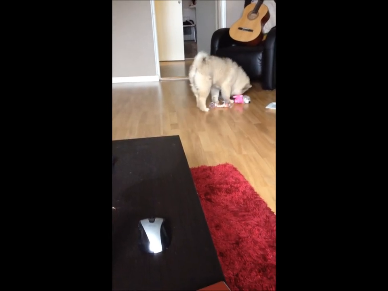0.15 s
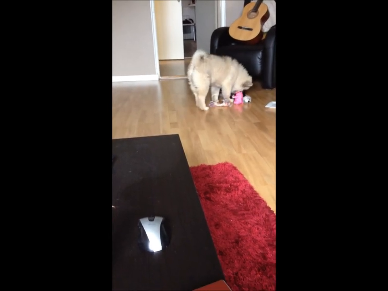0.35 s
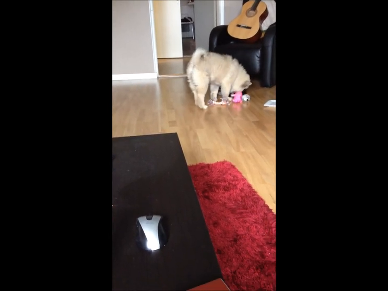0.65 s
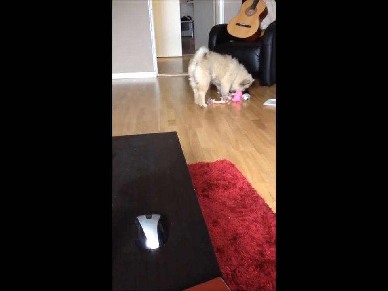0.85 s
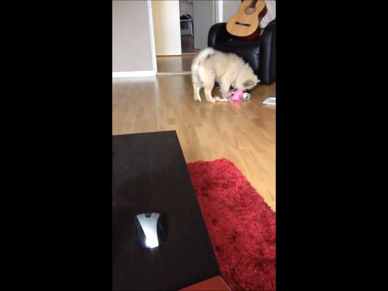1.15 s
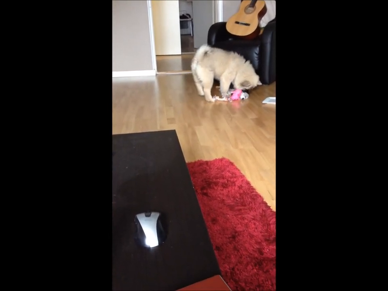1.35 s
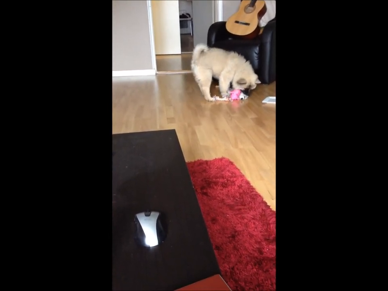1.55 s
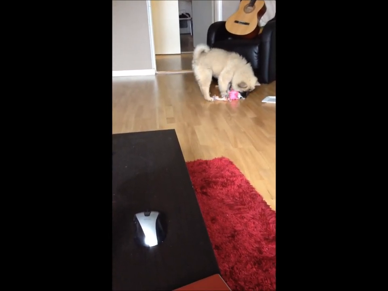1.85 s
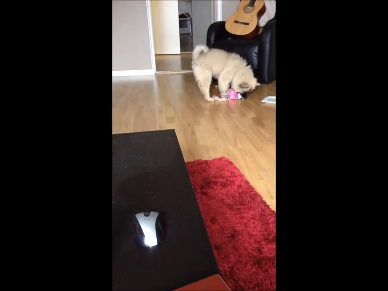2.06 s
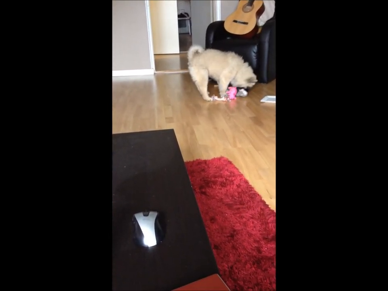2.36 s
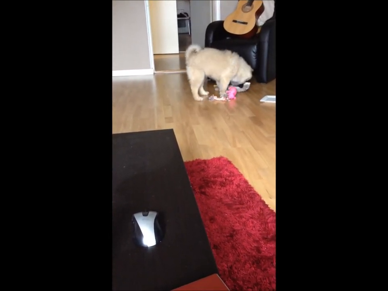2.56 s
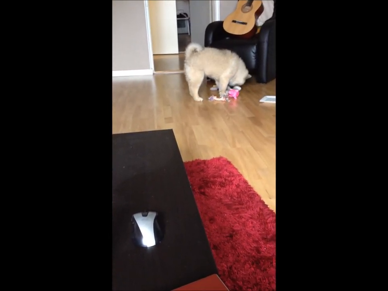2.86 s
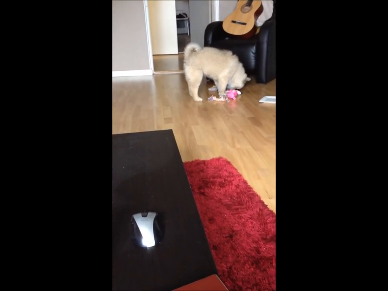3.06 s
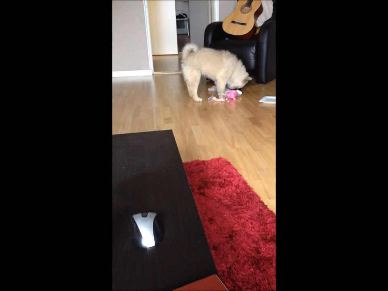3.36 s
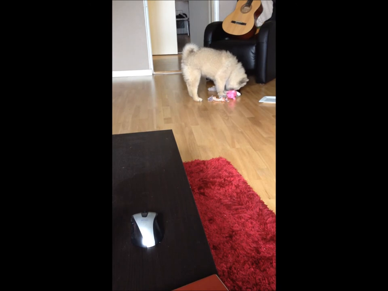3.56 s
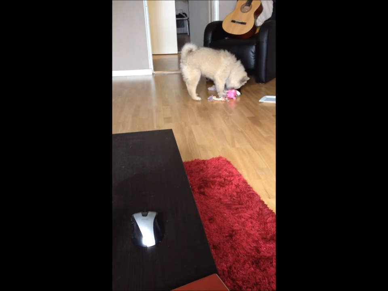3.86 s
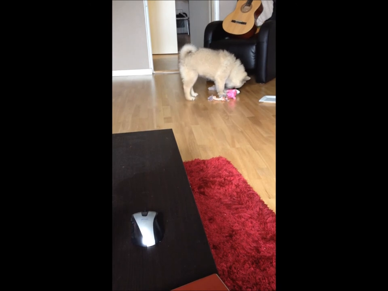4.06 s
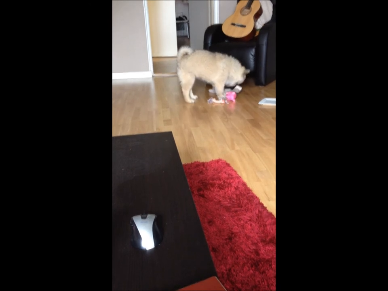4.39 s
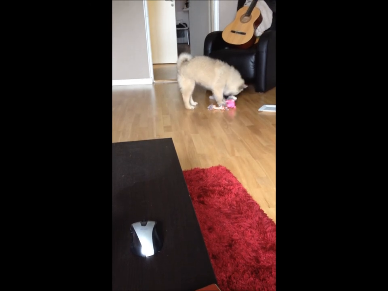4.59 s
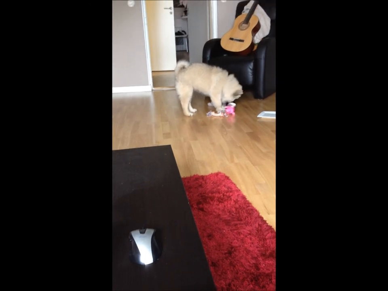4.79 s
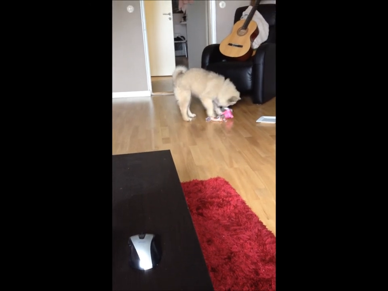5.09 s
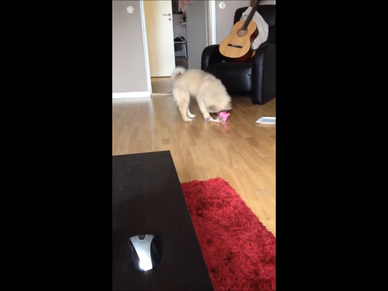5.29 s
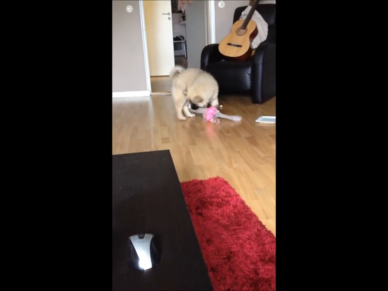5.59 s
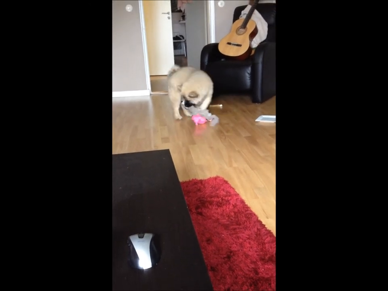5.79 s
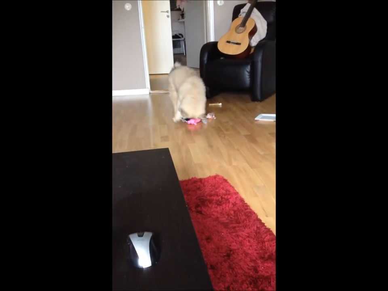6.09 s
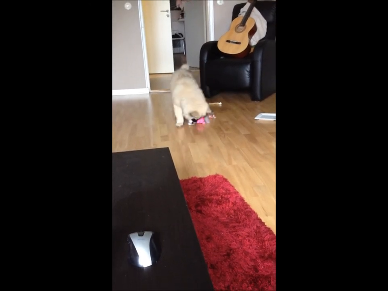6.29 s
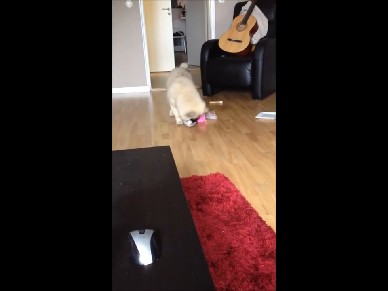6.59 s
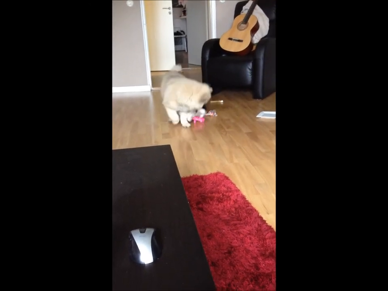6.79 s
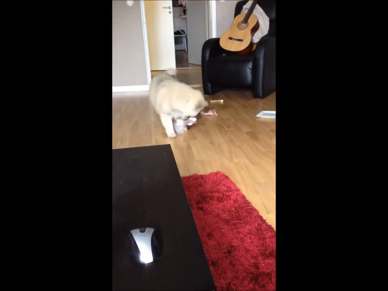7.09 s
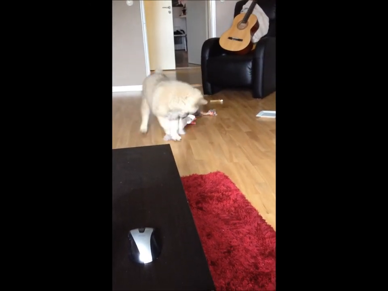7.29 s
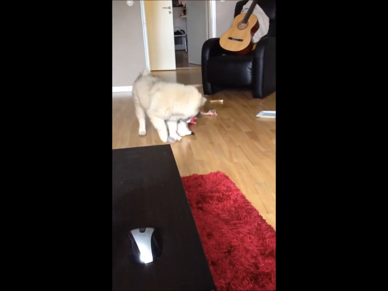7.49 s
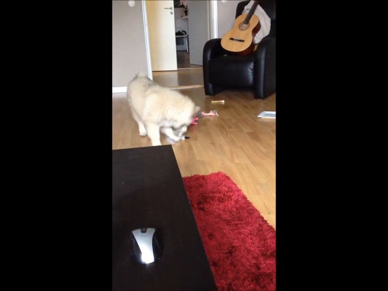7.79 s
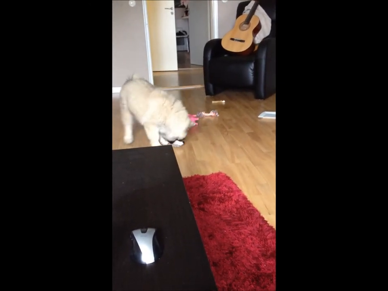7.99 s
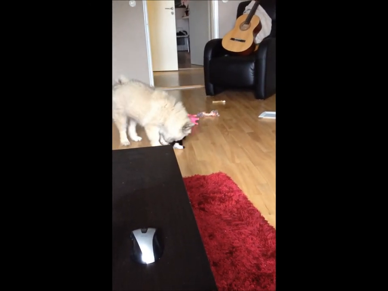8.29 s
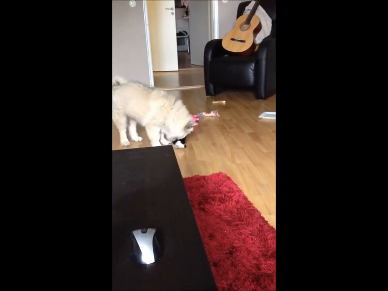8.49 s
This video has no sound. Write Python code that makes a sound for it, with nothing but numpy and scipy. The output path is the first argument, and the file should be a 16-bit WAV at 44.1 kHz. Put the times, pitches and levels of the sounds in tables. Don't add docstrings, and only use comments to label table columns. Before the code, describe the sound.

Distant phone pickup of a small dog on a hard floor: soft rustling and small knocks, a brief nip squeak, then a rapid run of harsh high toy squeaks, each answered by a lower, purer wheeze. The squeaking thins to faint chirps amid paw thuds and claw clicks, then the toy is slowly kneaded in wavering squeaks. Room echo, quiet hum and hiss throughout.

```python
import sys
import numpy as np
from scipy import signal
from scipy.fft import rfft, irfft, next_fast_len
from scipy.io import wavfile
from scipy.ndimage import map_coordinates

SR = 44100
rng = np.random.default_rng(int(sys.argv[2]) if len(sys.argv) > 2 else 0)


def persist_wave(psi):
    counts = np.round(np.clip(psi, -1, 1) * 32767).astype(np.int16)
    wavfile.write(sys.argv[1], SR, np.atleast_2d(counts).T)


def linear_from_db(decibels):
    return 10 ** (np.asarray(decibels, float) / 20)


N = 381465

# time [s], pitch [Hz].
BITE_PITCH = [
    [(3.136, 1350), (3.14, 1453), (3.147, 1459), (3.151, 1830), (3.165, 1562), (3.18, 1427)],
    [(3.591, 1219), (3.612, 1539), (3.628, 1494), (3.631, 1897), (3.645, 1696), (3.665, 1502)],
    [(3.914, 1204), (3.931, 1821), (3.948, 1870), (3.953, 1966), (3.972, 1901), (3.99, 1640), (4.012, 1346)],
    [(4.281, 1330), (4.29, 1669), (4.323, 1806), (4.335, 1986), (4.375, 1653)],
    [(5.147, 1342), (5.158, 1371), (5.172, 1299), (5.184, 1240)],
    [(5.774, 1400), (5.785, 1430), (5.81, 1329), (5.825, 1596), (5.84, 1560)],
    [(7.555, 1329), (7.561, 1528), (7.575, 1451), (7.6, 1394)],
]
# level at top pitch [dB], upper, middle and top partials [dB],
# chatter once the jaws close [0-1].
BITE_TONE = [
    (-17, -3.5, -1, -1, 0.62),
    (-15, -4.5, -0.4, -0.6, 0.597),
    (-12, -5.5, 2.7, -1.5, 0.565),
    (-17, -0.5, 0.041, 0.99, 0.573),
    (-32, -2, 1, 1, 0.38),
    (-32, 4, 1.7, -0.22, 0.673),
    (-29.5, 0.5, -0.34, -1.1, 0.533),
]
# time [s], pitch [Hz].
CHEW_PITCH = [
    [(7.898, 1277), (7.92, 1198), (7.94, 1292), (7.957, 1513), (7.975, 1454), (8.01, 1414)],
    [(8.05, 1166), (8.07, 1163), (8.115, 1291), (8.135, 1238), (8.165, 1167)],
    [(8.257, 1258), (8.275, 1283), (8.31, 1235), (8.33, 1425), (8.352, 1638), (8.365, 1578)],
    [(8.447, 1090), (8.465, 1225), (8.495, 1273), (8.53, 1161), (8.575, 1211), (8.59, 1170)],
]
# level at top pitch [dB], upper, middle and top partials [dB], chatter [0-1].
CHEW_TONE = [
    (-27.5, -1.4, 2.1, -2, .25),
    (-34, -1.3, 2.3, 2, 0.26),
    (-23, -2.1, 2, -2.5, 0.055),
    (-32.5, 0.54, 0, -2, 0.21),
]
BITE_DB_PER_OCTAVE, CHEW_DB_PER_OCTAVE = 24, 22
RISING_CHATTER, CLOSE_S, TIRE_DB_PER_S = 0.11, 0.013, 103

# time [s], pitch [Hz].
REFILL_PITCH = [
    [(2.653, 1071), (2.668, 1189), (2.69, 1142)],
    [(2.788, 1183), (2.81, 1187), (2.86, 1195), (2.9, 1181)],
    [(3.255, 1030), (3.27, 1045), (3.285, 1085)],
    [(3.317, 1143), (3.345, 1207), (3.39, 1156), (3.425, 1212), (3.455, 1174)],
    [(3.75, 1174), (3.78, 1114), (3.81, 1187), (3.83, 1120)],
    [(4.08, 1160), (4.11, 1200), (4.16, 1135), (4.2, 1188), (4.22, 1189)],
    [(4.4, 1157), (4.43, 1178), (4.48, 1143), (4.55, 1133)],
    [(4.725, 1130), (4.737, 1074), (4.755, 1098)],
    [(4.8, 1109), (4.82, 1192), (4.84, 1175), (4.86, 1130), (4.885, 1121)],
    [(7.054, 1044), (7.062, 1028), (7.07, 1040)],
    [(7.62, 1145), (7.65, 1182), (7.69, 1148), (7.745, 1108)],
]
# level [dB], upper partials [dB], second partial [dB], top partials [dB], fade [dB].
REFILL_TONE = [(-43.5, 9.5, -3, -2.5, -0.5), (-37.5, 3, -0.5, 0, 0), (-44, 0, 5, -2, 9),
               (-32.5, 3, -3, -4, 5), (-36.5, -1.5, 1.5, 1.5, 1), (-37, 1, -2, 1, -1.5),
               (-37.5, 5, 2, 1, 5), (-44, 10, -1.5, -14, 10.5), (-36.5, 3, 1.5, -0.5, 6),
               (-48.5, 13.5, -0.5, -10, 17), (-42, 8.5, -2.5, -2.5, 2)]
SWELL_S, SWELL_DB = 0.018, 2.5
REFILL_CHATTER, REFILL_END_CHATTER = 0.079, 0.23

# start [s], length [s], pitch [Hz], level [dB], upper partials [dB].
LIGHT_NIPS = [
    (1.885, 0.017, 1174, -35.5, 1.5),
    (5.426, 0.021, 1156, -39.5, 4),
    (6.567, 0.02, 1140, -43, 5),
]
NIP_FADE_DB, NIP_SAG = 19, 0.02
NIP_START_CHATTER, NIP_END_CHATTER = 0.15, 0.4

# frequency [Hz], gain [dB].
SLACK_SHELL = [(800, 22.5), (1170, 4), (2350, -4), (3500, -8.5), (4700, -10.5), (5900, -17), (7050, 1.5),
               (8250, 0.5), (9400, -11), (10600, -34), (11800, -29), (13000, -24.5), (14200, -24),
               (15300, -47)]
# frequency [Hz], gain [dB].
TIGHT_SHELL = [(300, -62), (900, -5.5), (1300, -4), (1800, -6.5), (2600, -6.5), (3600, -10.5), (4500, -7.5),
               (5500, -7.5), (6500, -2.5), (7300, 0.5), (8500, -9), (9500, -21.5), (10600, -37),
               (14500, -34.5)]

# time [s], thud [dB], board mode [Hz], snap [dB].
TOY_POPS = [(.725, -62, 250, -61.5), (0.86, -55, 244, -72), (1.046, -56, 262, -84), (3.15, -43, 340, -39.5),
            (3.629, -42, 393, -40), (3.951, -55, 298, -41), (3.975, -66, 308, -32), (4.325, -49, 356, -29),
            (4.632, -45.5, 270, -38), (4.644, -50, 348, -39), (5.897, -39.5, 248, -40.5),
            (5.913, -41.5, 237, -38.5), (5.924, -65, 298, -37), (6.45, -70, 250, -53)]
POP_HZ, POP_WIDTH_HZ = 1820, 290
# time [s], thud [dB], board mode [Hz], click [dB].
CLAW_CLICKS = [
    (.736, -79, 300, -66),
    (1.717, -85, 300, -86),
    (6.562, -70, 300, -51),
    (6.859, -60, 395, -38),
]
CLICK_HZ, CLICK_WIDTH_HZ = 2080, 710
# time [s], thud [dB], board mode [Hz], slap [dB].
PAW_FALLS = [(1.109, -63, 248, -89), (2.761, -52.5, 250, -63), (3.429, -52, 218, -52),
             (5.196, -51, 408, -34.5), (5.209, -56, 405, -58), (5.717, -39.5, 254, -56),
             (5.733, -52, 272, -60), (5.811, -42.5, 284, -36.5), (6.055, -46, 280, -76),
             (6.266, -36.5, 215, -77), (6.291, -67, 230, -53), (6.333, -54.5, 242, -78),
             (6.566, -48, 342, -44.5), (6.643, -47.5, 298, -63), (6.862, -79, 506, -47),
             (7.067, -45, 278, -75), (7.126, -42.5, 290, -73)]
SLAP_HZ, SLAP_WIDTH_HZ = 667, 650

# start [s], length [s], level [dB], lowest frequency [Hz],
# lateness of the swell [exponent].
STROKES = [(0, 0.05, -66.5, 700, 0.14), (0.122, 0.47, -77.5, 400, 0.67), (0.734, 0.0024, -63, 3000, 0.8),
           (0.731, 0.028, -62.5, 1760, 0.31), (0.856, 0.032, -65.5, 1700, 0.65),
           (1.026, 0.043, -69, 2620, 0.55), (1.433, 0.027, -71.5, 1490, .8),
           (1.714, 0.002, -70, 6500, 0.81), (2.405, 0.097, -63.5, 1990, 0.99),
           (2.567, 0.18, -70, 6200, 1.4), (4.612, 0.076, -62, 1300, 1.1), (5.198, 0.06, -53, 2320, 0.29),
           (5.549, 0.11, -66.5, 2500, 0.65), (5.789, 0.18, -61.5, 2200, 1.9),
           (6.16, 0.097, -65, 3000, 0.49), (6.446, 0.019, -56, 2300, 1), (6.759, 0.024, -61, 910, 0.84),
           (6.57, 0.01, -60, 1500, 0.34), (6.864, 0.037, -51.5, 2400, 0.46), (7.095, 0.21, -54, 1970, 0.43),
           (7.422, .1, -73, 3050, 0.49)]
# frequency [Hz], density [dB per Hz].
FRICTION_SPECTRUM = [(400, -14), (2000, -0.5), (4000, -2.5), (8000, -3), (9900, -14), (12000, -12),
                     (15300, -16)]
DULLING = 2000

# frequency [Hz], T60 [s].
ROOM_T60 = [(200, 0.41), (1200, 0.49), (4000, 0.51), (8000, 0.4), (14000, 0.31)]

# time [s], change of background level [dB].
MOVEMENT = [
    (0, 0.5),
    (.45, 4.5),
    (.65, -1.5),
    (5, 2.5),
    (5.7, 4),
    (7.3, 6),
    (7.5, 1.5),
    (8.65, -2),
]
# frequency [Hz], density [dB per Hz].
HUM_SPECTRUM = [(15, -20), (45, -39), (85, -21), (125, -8), (165, -6), (210, 2.5), (300, -8.5), (450, -6.5),
                (900, -17.5), (1400, -24)]
# frequency [Hz], density [dB per Hz].
HISS_SPECTRUM = [(350, -22), (700, 3.5), (2000, 0.5), (5000, -5), (8000, -6), (9700, -29.5), (12500, -13.5),
                 (15300, -7.5)]
HUM_DB, HISS_DB = -71, -75
HUM_STIRS, HISS_STIRS = 1.1, 0.41


def squeak(rows, second_db, middle_db, top_db):
    s, *columns = np.transpose(rows)
    size = SR // 3
    t = s[0] + np.arange(size) / SR
    hz, db, upper_db, chatter = (np.interp(t, s, column) for column in columns)
    chatter = np.clip(chatter, 0, 1) ** 1.215
    squeeze = np.clip((hz - 1230) / 150, 0, 1)
    hz = hz * (1 + 0.17 * chatter * wobble(size, 508.6) + 0.0041 * wobble(size, 65))
    phase = 2 * np.pi * np.cumsum(hz) / SR

    k = np.arange(1, 14)[:, None]
    shell_db = along(SLACK_SHELL, k * hz) * (1 - squeeze) + along(TIGHT_SHELL, k * hz) * squeeze
    grip_db = np.where(k == 2, second_db, along([(5000, middle_db), (6500, top_db)], k * hz))
    partials = linear_from_db(shell_db + (k > 1) * (upper_db + grip_db)) * (k * hz < 15400)
    tone = np.sum(partials * np.sin(k * phase + 0.712 * k ** 2), 0)

    rush = noise(size, TIGHT_SHELL) * (1 + np.cos(phase)) * linear_from_db(upper_db)
    onset = np.clip((t - s[0]) / 0.0024, 0, 1)
    release = linear_from_db(np.minimum(0, -60 * (t - s[-1]) / 0.004))
    flutter_db = 6 * chatter * wobble(size, 135.4)
    return linear_from_db(db - 5.5 + flutter_db) * onset * release * (0.77 * tone + 0.52 * chatter * rush)


def bite(curve, db, upper_db, middle_db, top_db, chatter, db_per_octave):
    s, hz = np.transpose(curve)
    past = np.maximum(0, s - s[np.argmax(hz)])
    level = db + db_per_octave * np.log2(hz / hz.max()) - TIRE_DB_PER_S * past
    closing = np.clip(past / CLOSE_S + 0.61 * (hz == hz.max()), 0, 1)
    rough = RISING_CHATTER + (chatter - RISING_CHATTER) * closing
    rows = np.transpose([s, hz, level, upper_db + 0 * s, rough])
    return squeak(rows, second_db=1, middle_db=middle_db, top_db=top_db)


def refill(curve, db, upper_db, second_db, top_db, fade_db):
    s, hz = np.transpose(curve)
    swell = SWELL_DB * np.clip(1 - (s - s[0]) / SWELL_S, 0, 1)
    level = db - swell - fade_db * (s - s[0]) / (s[-1] - s[0])
    rough = np.where(s < s[-1], REFILL_CHATTER, REFILL_END_CHATTER)
    rows = np.transpose([s, hz, level, upper_db + 0 * s, rough])
    return squeak(rows, second_db, middle_db=-1.0, top_db=top_db)


def nip(s, length, hz, db, upper_db):
    start = (s, hz, db, upper_db, NIP_START_CHATTER)
    end = (s + length, hz * (1 - NIP_SAG), db - NIP_FADE_DB, upper_db, NIP_END_CHATTER)
    return squeak([start, end], second_db=-1.5, middle_db=-1.0, top_db=-0.5)


def knock(thud_db, board_hz, snap_db, snap_hz, width_hz):
    size = SR // 8
    blow = 0.06 * rng.standard_normal(size) * linear_from_db(-60 * np.arange(size) / SR / 0.008)
    blow[0] = 1
    thud = filtered(blow, resonance(board_hz, 164))
    thud = filtered(thud, padded_contact(1250))
    snap = filtered(blow, resonance(snap_hz, width_hz))
    snap = filtered(snap, resonance(snap_hz, 3.4 * width_hz))
    snap = filtered(snap, padded_contact(3.65 * snap_hz))
    return linear_from_db(thud_db - 19) * unit(thud) + linear_from_db(snap_db - 20.0) * unit(snap)


def resonance(hz, width_hz):
    return lambda f: 1j * f * width_hz / (hz ** 2 - f * f + 1j * f * width_hz)


def padded_contact(top_hz):
    return lambda f: 1 / (1 + 1j * f / top_hz) ** 3


def rustle(length, db, low_hz, lateness):
    size = SR // 2
    progress = np.clip(np.arange(size) / SR / length, 0, 1)
    grains = noise(size, FRICTION_SPECTRUM) * linear_from_db(3.7 * wobble(size, 153.4))

    def stroke_band(f):
        low_edge = 1 / np.sqrt(1 + (low_hz / (f + 1)) ** 8)
        return low_edge / (1 + (f * length / DULLING) ** 2)

    return linear_from_db(db) * np.sin(np.pi * progress ** lateness) * unit(filtered(grains, stroke_band))


def add(out, x, s, wet_db):
    hz, t, z = signal.stft(rng.standard_normal(SR * 3 // 4), SR, nperseg=256)
    tail = signal.istft(z * linear_from_db(-60 * t / along(ROOM_T60, hz)[:, None]), SR, nperseg=256)[1]
    tail_s = np.arange(len(tail)) / SR
    tail = tail * np.clip(tail_s / 0.0039, 0, 1)
    tail = tail * (1 + 0.18 * linear_from_db(-60 * tail_s / 0.25))
    heard = linear_from_db(wet_db) * signal.fftconvolve(x, tail / np.linalg.norm(tail))
    heard[:len(x)] += x
    out[round(s * SR):][:len(heard)] += heard


def air():
    stir_db = np.interp(np.arange(N) / SR, *np.transpose(MOVEMENT))
    hum = linear_from_db(HUM_DB + HUM_STIRS * stir_db + 2 * wobble(N, 9.7)) * noise(N, HUM_SPECTRUM)
    hiss = linear_from_db(HISS_DB + HISS_STIRS * stir_db + wobble(N, 7)) * noise(N, HISS_SPECTRUM)
    return hum + hiss


def noise(size, spectrum):
    return unit(filtered(rng.standard_normal(size), lambda hz: linear_from_db(along(spectrum, hz))))


def wobble(size, rate):
    return map_coordinates(rng.standard_normal(size + 4), [np.arange(size) * rate / SR])


def filtered(x, response):
    m = next_fast_len(len(x) + 4096)
    return irfft(rfft(x, m) * response(np.fft.rfftfreq(m, 1 / SR)), m)[:len(x)]


def along(points, hz):
    f, v = np.transpose(points)
    return np.interp(np.log(hz + 1), np.log(f + 1), v)


def unit(x):
    return x / np.sqrt(np.mean(x ** 2) + 1e-20)


def scene():
    out = np.zeros(N + 2 * SR)
    for curve, row in zip(BITE_PITCH, BITE_TONE):
        add(out, bite(curve, *row, BITE_DB_PER_OCTAVE), curve[0][0], wet_db=2.5)
    for curve, row in zip(CHEW_PITCH, CHEW_TONE):
        add(out, bite(curve, *row, CHEW_DB_PER_OCTAVE), curve[0][0], wet_db=5.0)
    for curve, row in zip(REFILL_PITCH, REFILL_TONE):
        add(out, refill(curve, *row), curve[0][0], wet_db=1.0)
    for row in LIGHT_NIPS:
        add(out, nip(*row), row[0], wet_db=6.0)
    for s, *blow in TOY_POPS:
        add(out, knock(*blow, POP_HZ, POP_WIDTH_HZ), s, wet_db=4.5)
    for s, *blow in CLAW_CLICKS:
        add(out, knock(*blow, CLICK_HZ, CLICK_WIDTH_HZ), s, wet_db=6)
    for s, *blow in PAW_FALLS:
        add(out, knock(*blow, SLAP_HZ, SLAP_WIDTH_HZ), s, wet_db=8)
    for s, *stroke in STROKES:
        add(out, rustle(*stroke), s, wet_db=5.5)
    small = filtered(out[:N], lambda f: (1j * f / (1j * f + 150)) ** 4)
    return (small + air())[None]


def top_cut(x):
    return signal.sosfilt(signal.butter(12, 15680, fs=SR, output="sos"), x)


def record(dry):
    band = filtered(dry[0], lambda f: f < 15350)
    return top_cut(band[None])


dry = scene()
out = record(dry)
persist_wave(out)
```